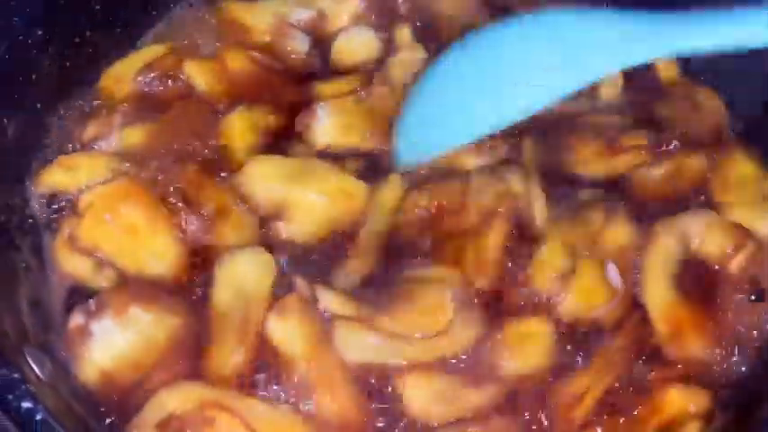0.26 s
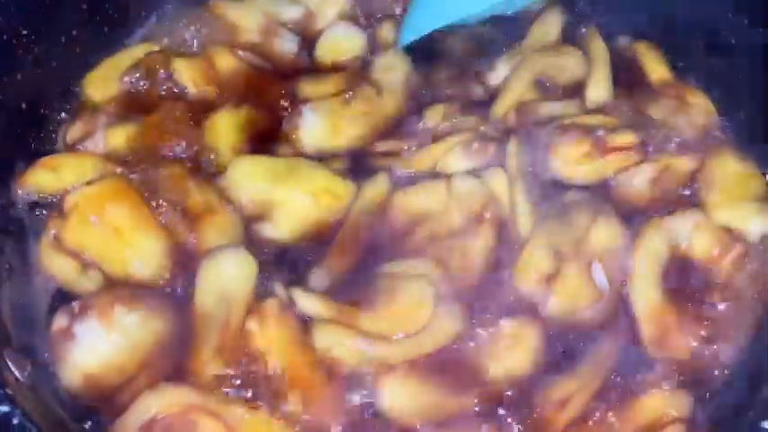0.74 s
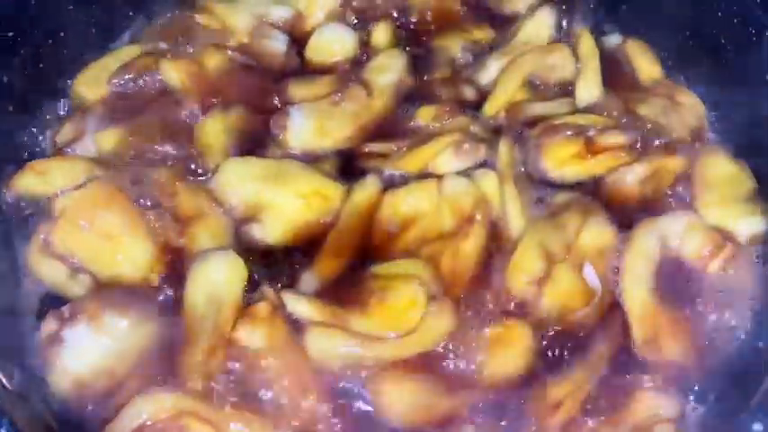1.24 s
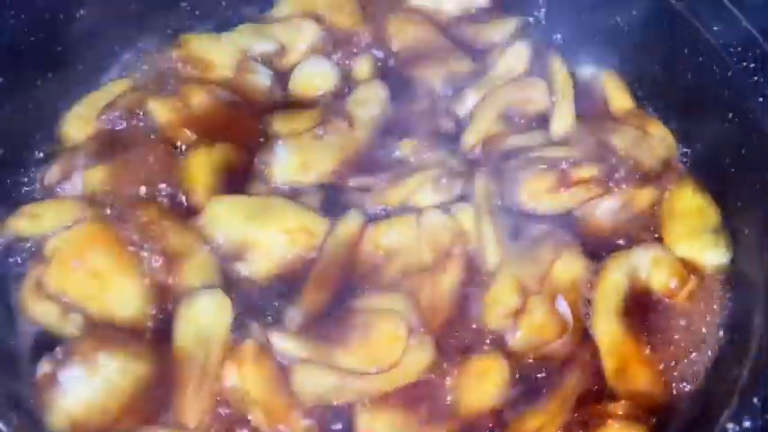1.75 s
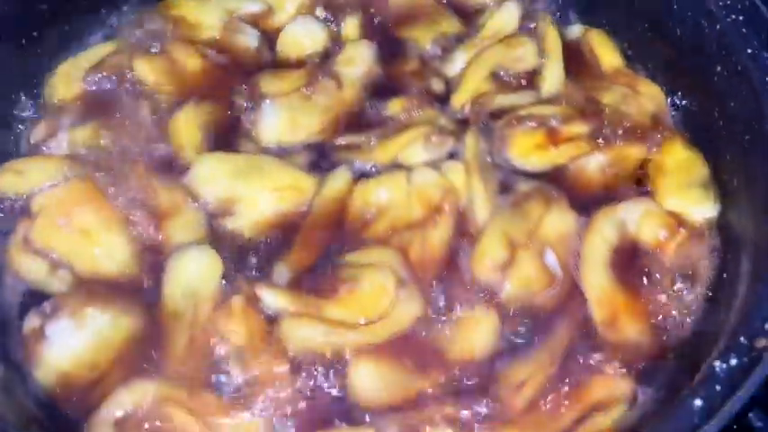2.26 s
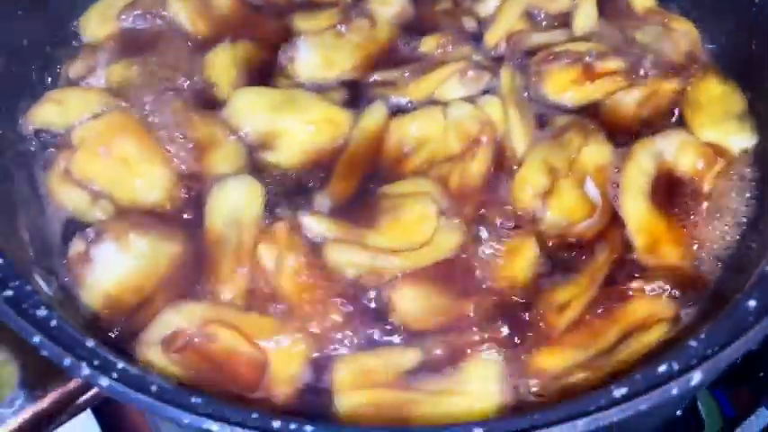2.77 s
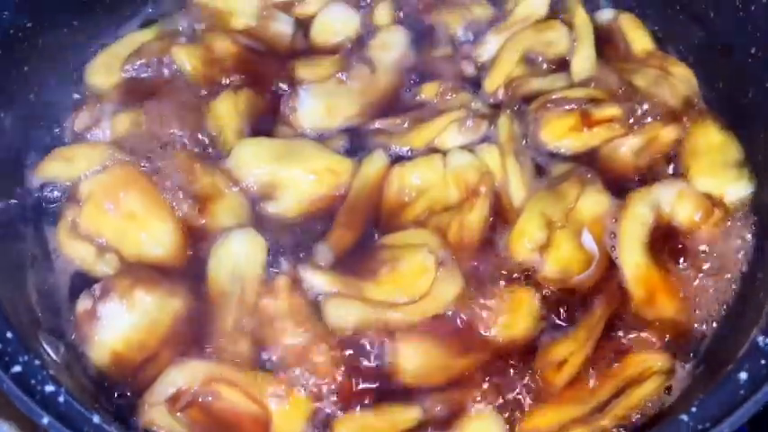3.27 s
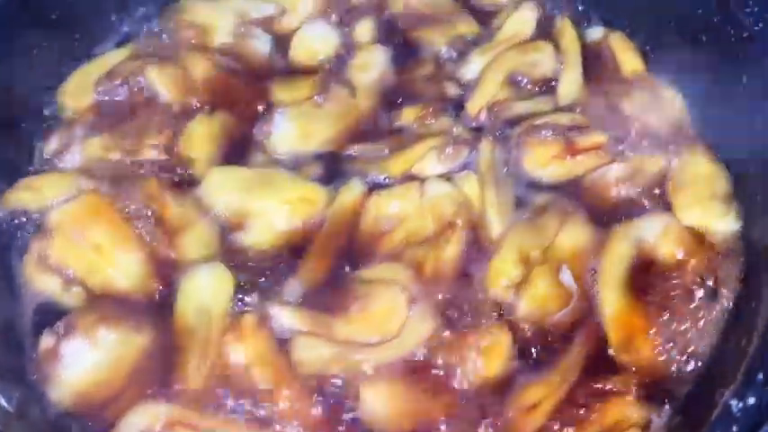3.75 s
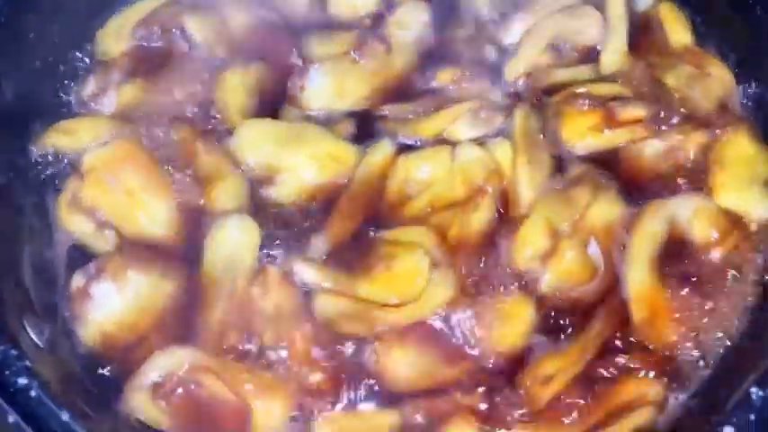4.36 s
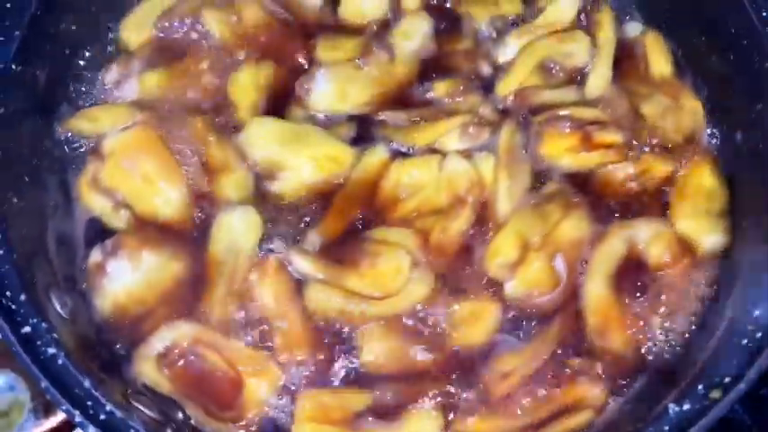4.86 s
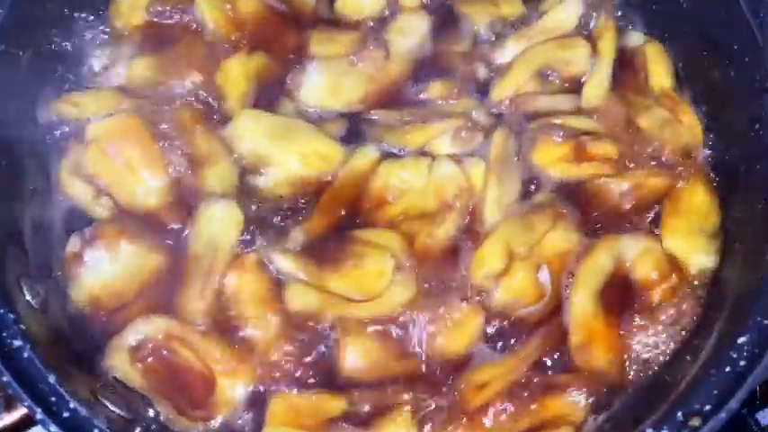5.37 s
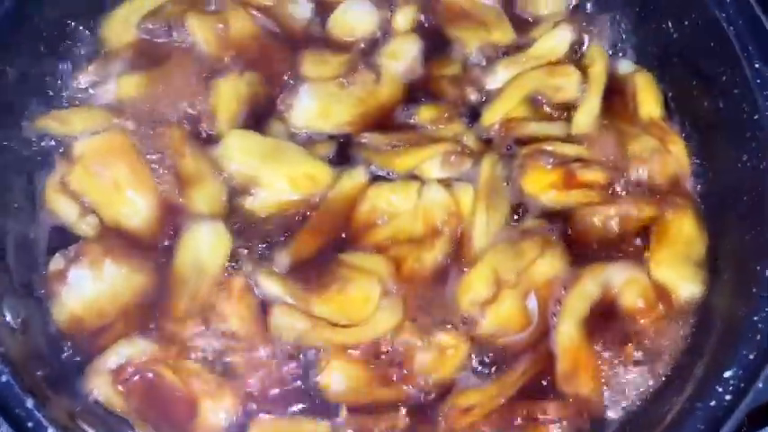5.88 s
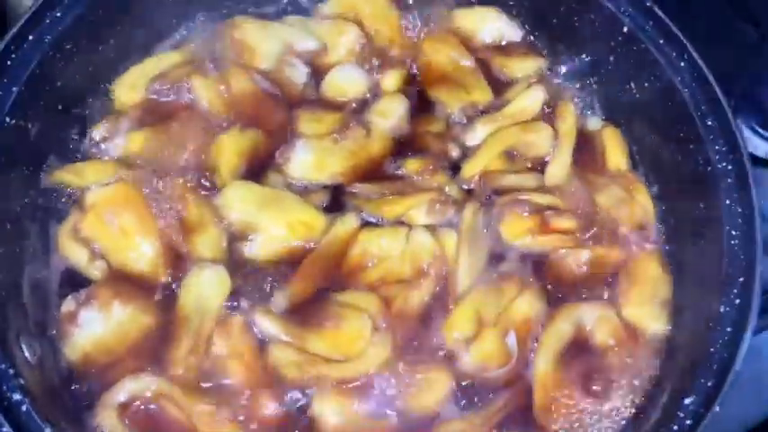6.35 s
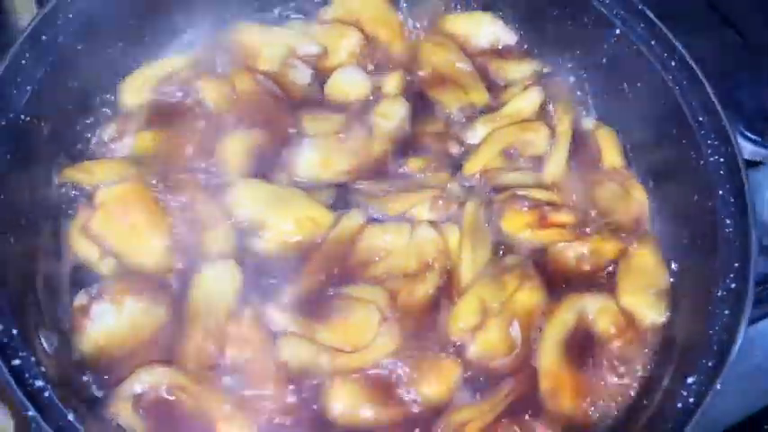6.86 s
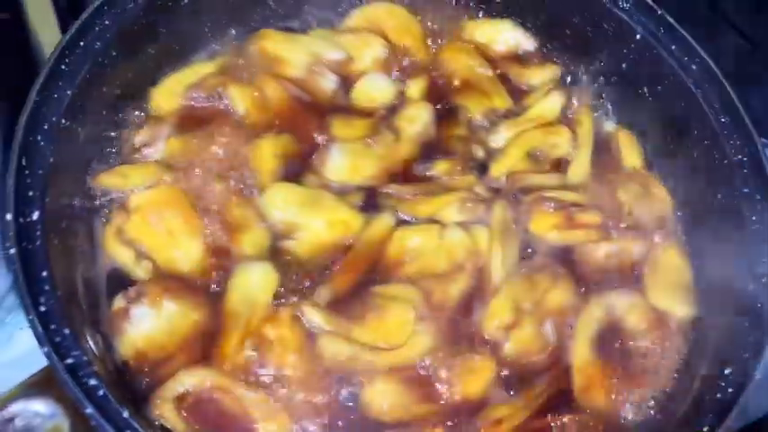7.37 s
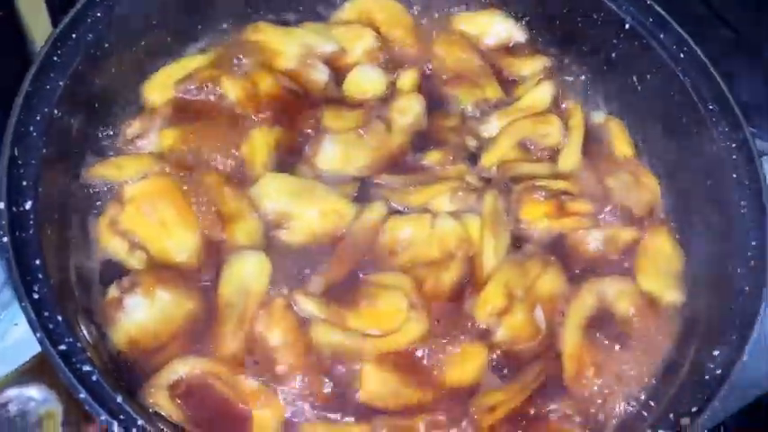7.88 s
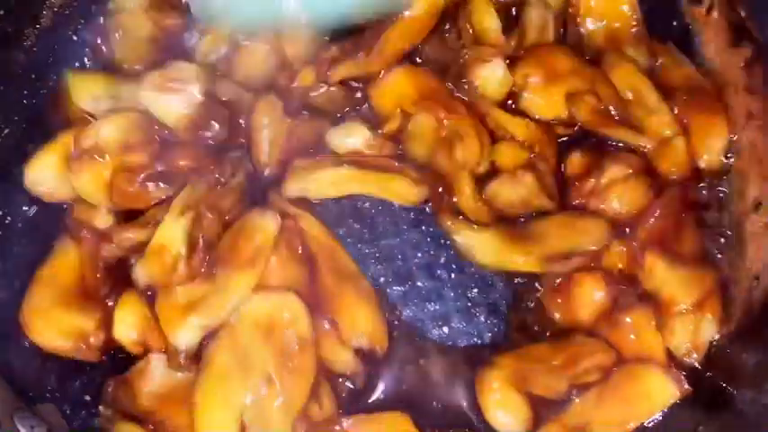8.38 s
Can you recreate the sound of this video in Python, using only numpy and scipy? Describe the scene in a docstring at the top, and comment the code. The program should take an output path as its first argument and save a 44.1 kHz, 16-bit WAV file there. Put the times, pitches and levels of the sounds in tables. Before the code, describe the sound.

Thick syrup with fruit bubbles and pops close up in a pan, sizzling at the rim, with one spatula clack midway, then abrupt silence.

```python
"""Fruit simmers in thick syrup in a pan: bubbles burst as short decaying pressure swings over a dense crowd
of smaller bursts, heard from just above by a pair of close microphone ports.
Syrup sizzles at the hot rim (tiny bursts plus hiss) and spits (ticks with a spray of noise).
A spatula is put down once and bounces: thunks, ringing pan modes, dying noise and two squeaky skids.
Steam brushes the microphone, the stove rumbles and hums below, and the sound stops dead near the end."""
import sys
import numpy as np
from scipy import signal
from scipy.fft import rfft, irfft, next_fast_len
from scipy.io import wavfile
from scipy.ndimage import uniform_filter1d

SR = 44100
rng = np.random.default_rng(int(sys.argv[2]) if len(sys.argv) > 2 else 0)


def waveform_to_disk(signal):
    """Save audio, clipped to [-1, 1], as 16-bit WAV at the path in sys.argv[1]."""
    frames = np.transpose(np.atleast_2d(signal))
    scaled = np.clip(frames, -1, 1) * 32767
    samples = np.round(scaled).astype(np.int16)
    wavfile.write(sys.argv[1], SR, samples)


N = 380141
TIME = np.arange(N) / SR
STOP_S = 8.013
LULL_S, USUAL_GULP_DB = 0.026, -42


# Bursting bubbles that stand out. Each row: start in seconds, pop peak in dB before trim, pitch in Hz,
# cycles to the envelope peak, gulp in dB before trim.
BIG_BUBBLES = [(0.0621, -27, 1280, 0.52, -38), (0.0795, -37, 920, 1.1, -40),
               (0.2958, -37.5, 820, 0.52, -38), (0.4747, -30.5, 880, 0.48, -37),
               (0.534, -38, 1000, 0.35, -56), (0.6841, -31.5, 1410, 1.2, -34.5),
               (0.6916, -30, 1500, 0.85, -45), (0.804, -38, 1380, 0.97, -38),
               (0.9234, -37.0, 1350, 1.1, -35), (1.0993, -26, 1360, 0.6, -35),
               (1.1261, -30, 1280, 1.2, -34), (1.2685, -32.5, 1270, 1, -33.5),
               (1.379, -36.0, 1400, 1.2, -52), (1.405, -27.0, 1360, 1.4, -31), (1.498, -35, 900, 0.53, -38),
               (1.5054, -26.5, 1450, 0.35, -47), (1.59, -33.0, 1400, 0.41, -50),
               (1.7188, -27.5, 850, 0.21, -46), (1.822, -29, 1110, 0.23, -35.5),
               (1.883, -31.0, 1200, 0.32, -59), (1.9688, -29.5, 880, 0.25, -39),
               (2.0827, -28, 1210, 0.34, -46), (2.097, -37, 774, 0.69, -51), (2.1994, -39, 796, 0.9, -42),
               (2.227, -29, 1150, 0.25, -40), (2.3073, -28.5, 1310, 0.25, -40),
               (2.3657, -27.5, 1360, 0.32, -35), (2.5519, -33.0, 1120, 0.45, -42),
               (2.6306, -28.5, 1000, 0.25, -35), (2.6416, -33, 1310, 0.25, -50),
               (2.7003, -24, 1550, 0.45, -34), (2.9356, -32.0, 784, 0.3, -31),
               (3.0884, -24.0, 1280, 1.4, -33), (3.3576, -35, 1070, 0.45, -44),
               (3.3647, -37, 1440, 0.75, -40), (3.3844, -29, 970, 0.29, -39), (3.5063, -38, 1610, 0.9, -42),
               (3.7616, -32.0, 1190, 0.35, -44), (3.8263, -31.5, 1150, 0.25, -50),
               (3.9435, -30, 1190, 0.28, -52), (4.106, -33.5, 1390, 0.82, -37),
               (4.235, -33, 1530, 0.9, -35.5), (4.33, -35, 790, 0.45, -41), (4.3532, -39, 1310, 0.29, -46),
               (4.655, -34.5, 1550, 0.6, -41), (4.7335, -37.5, 1400, 1.2, -48),
               (4.8703, -33.5, 900, 0.99, -37.5), (4.889, -28.5, 1000, 0.32, -43),
               (5.1397, -35.5, 1110, 0.45, -51), (5.2265, -29.5, 1420, 1.1, -38),
               (5.2815, -28, 880, 0.3, -41), (5.353, -26, 1520, 1.3, -35), (5.4519, -32, 970, 0.25, -36),
               (6.0556, -24, 1160, 0.45, -45), (6.0772, -28.5, 1264, 0.42, -33),
               (6.126, -34.5, 850, 0.56, -46), (6.2245, -30, 820, 0.23, -40), (6.281, -32, 1050, 0.71, -46),
               (6.3694, -35.5, 1260, 0.6, -47), (6.58, -34.5, 650, 0.45, -38),
               (6.6895, -33.5, 1660, 0.6, -41), (6.7833, -34, 780, 0.72, -30.5),
               (6.8603, -33, 1150, 0.42, -43), (6.867, -39, 740, 0.67, -32), (6.8931, -40, 1260, 0.68, -51),
               (6.973, -38.0, 1400, 1.1, -43), (6.9805, -36, 1400, 0.97, -33.5),
               (7.0138, -34.5, 1150, 1, -43), (7.1089, -31, 1000, 0.68, -49), (7.279, -37, 1350, 0.69, -36),
               (7.374, -25, 1000, 0.29, -38), (7.5709, -39, 800, 0.68, -45), (7.613, -31, 1100, 0.42, -36),
               (7.619, -38, 860, 0.9, -37), (7.688, -39, 1190, 1.1, -57), (7.7032, -34, 1410, 0.8, -41),
               (7.7123, -33, 1200, 0.45, -55), (7.8598, -30.5, 1730, 0.53, -46)]
# Splutter spectrum. Each row: frequency in Hz, relative density in dB per Hz.
SPLUTTER_SPECTRUM = [(100, -17), (350, -3.5), (850, 2.5), (1100, -7), (1450, 1.5), (2400, -6.5),
                     (3300, -14), (6000, -39), (16000, -51)]
# Pop colouring. Each row: frequency in Hz, gain in dB.
POP_GAIN = [(100, -15.5), (400, -5.5), (700, 1), (1500, 0), (2500, 1.5), (3500, -9), (8000, -13.5)]


def plops(level_db=-1.5, tear_hz=2200, tear_db=-11, body_hz=720, body_db=-8,
          gulp_hz=410, gulp_cycles=0.72, gulp_level_db=-2, wall_s=0.0017, wall_db=-13,
          splutter_s=0.011, splutter_db=-48, splutter_per_gulp=0.3, size=1400):
    """A film snaps or rings over a rounder body; the pan wall echoes, the syrup gulps shut and splutters."""
    pops, syrup = np.zeros(N), np.zeros(N)
    splutter_decay = np.exp(-TIME[:size] / splutter_s)
    for s, db, hz, cycles, gulp_db in np.vstack([BIG_BUBBLES, lesser_bubbles()]):
        place, depth = rng.standard_normal(2)
        tear = gain_of(tear_db) * burst(tear_hz, 0.39, size)
        pop = gain_of(db + level_db) * (burst(hz, cycles, size) + tear)
        body = gain_of(db + body_db) * cycles * burst(body_hz, 0.5, size)
        add(pops, s, pop + body)
        add(pops, s + wall_s * np.exp(0.27 * place), gain_of(wall_db) * pop)

        gulp = burst(gulp_hz * np.exp(-0.2 * depth), gulp_cycles, size)
        add(syrup, s, gain_of(gulp_db + gulp_level_db) * gulp)
        # deeper gulps splutter more
        wet_db = splutter_db + splutter_per_gulp * (gulp_db - USUAL_GULP_DB)
        hiss = evened(tint(rng.standard_normal((1, size)), SPLUTTER_SPECTRUM))[0]
        add(syrup, s, gain_of(wet_db) * hiss * splutter_decay)
    return ports(tint(pops[None], POP_GAIN)[0] + syrup)


# Lulls when hardly a bubble bursts. Each entry: centre in seconds.
LULL_TIMES = [0.41, 0.755, 1.23, 1.76, 2.035, 2.45, 3.03, 3.889, 4.17, 4.4, 5.51, 5.89, 6.17, 7.05, 7.19,
              7.53, 7.825]


def lesser_bubbles(per_s=6, level_db=-40, spread_db=0.5, usual_hz=1200, spread_octaves=0.35,
                   usual_cycles=0.57, gulp_re_pop_db=-8):
    """Middling bubbles burst at random moments outside the lulls; rows as in BIG_BUBBLES."""
    when, size, depth, ring = rng.standard_normal((200, 4)).T
    s = (np.arange(len(when)) + when) / per_s
    db = level_db + spread_db * size
    hz = usual_hz * 2 ** (spread_octaves * depth)
    cycles = usual_cycles * np.exp(0.35 * ring)
    rows = np.c_[s, db, hz, cycles, db + gulp_re_pop_db]
    resting = abs(s[:, None] - np.array(LULL_TIMES)).min(1) < 2 * LULL_S
    return rows[(s > 0) & (s < STOP_S) & ~resting]


# Small-bubble spectrum. Each row: frequency in Hz, relative density in dB per Hz.
SIMMER_SPECTRUM = [(60, -31), (150, -14.5), (320, 6), (410, -5.5), (500, -1.5), (640, -3.5), (870, 1.5),
                   (1050, -4.5), (1330, 0), (1700, -4), (2350, -7.5), (3300, -21), (6000, -36),
                   (16000, -55)]


def simmer(level_db=-49, clump_s=0.018, clump_db=1.4):
    """Countless small bubbles burst in thick syrup; a random level waver and the surges clump them."""
    crowd = swarm(lo_hz=175.5, hi_hz=3080, per_s=650, spread_db=2.5, cap_db=10.5, cycles=0.3,
                  spray_db=-12.5, spray_s=0.004)
    knots_s = np.cumsum(rng.uniform(0.5, 1.5, 2000)) * clump_s
    clumps = evened(np.interp(TIME, knots_s, rng.uniform(-1, 1, len(knots_s))))
    clumped = evened(tint(crowd, SIMMER_SPECTRUM) * gain_of(clump_db * clumps))
    return ports(*(clumped * gain_of(level_db + surges())))


def surges(surge_db=4, surge_s=0.019, from_gulp_db=-53, gulp_range_db=14.5, lull_db=5.5):
    """Boil level in dB: big bubbles with deep gulps stir their neighbours; in a lull spent syrup rests."""
    t = TIME[::128, None]
    s, gulp_db = np.array(BIG_BUBBLES)[:, 0], np.array(BIG_BUBBLES)[:, -1]
    stir = np.maximum(gulp_db - from_gulp_db, 0) / gulp_range_db
    swell = ((t > s) * stir * np.exp(-abs(t - s) / surge_s)).max(1)
    rest = np.exp(-((t - np.array(LULL_TIMES)) / LULL_S) ** 2).max(1)
    return np.interp(TIME, t[:, 0], surge_db * swell - lull_db * rest)


# Rim sizzle curve. Each row: time in seconds, level in dB, of which only the swing about the median is
# used, scaled by "follow".
SIZZLE_CURVE = [(0.0, -57.5), (0.84, -58), (1.08, -56.5), (1.92, -58), (2.04, -57), (2.28, -58.5),
                (2.4, -57.5), (3.24, -57.5), (3.6, -57), (3.72, -58), (4.08, -58), (6.96, -57), (7.08, -58),
                (7.99, -57.5)]
# Rim sizzle spectrum. Each row: frequency in Hz, relative density in dB per Hz.
SIZZLE_SPECTRUM = [(800, -32), (2500, 2.5), (4000, 1.5), (6500, 1.5), (10500, -2), (13500, -8), (14700, -6),
                   (16000, -8)]


def sizzle(level_db=-58.0, hiss_db=-3, follow=3.5):
    """Tiny droplets flash to steam at the rim over a fine hiss."""
    crackle = evened(swarm(lo_hz=2500, hi_hz=14300, per_s=1300, spread_db=3.5, cap_db=18.0, cycles=0.61,
                           spray_db=1.5, spray_s=0.004))
    fizz = crackle + gain_of(hiss_db) * rng.standard_normal((2, N))
    level = gain_of(level_db + follow * swing(SIZZLE_CURVE))
    return ports(*(evened(tint(fizz, SIZZLE_SPECTRUM)) * level))


# Loudest droplets on hot metal. Each row: time in seconds before the flash delay, level in dB before trim,
# tick body in dB relative to that level before the wet trim.
SPIT_DROPS = [(0.0278, -32, -26), (0.044, -42, -14), (0.0662, -35, -6), (0.1493, -37, 7),
              (0.3492, -35, -19), (0.5397, -43, -12), (0.7187, -36.5, -3), (0.959, -38, -1),
              (0.97, -37, -10), (1.0271, -41, -17), (1.059, -34.5, -12), (1.1044, -37, 0),
              (1.2623, -35.5, -24), (1.305, -36.5, -3), (1.4643, -43, -14), (1.5855, -37, -32),
              (1.717, -36, -29), (1.7812, -36, -30), (2.0492, -37, -11), (2.1108, -37, -12),
              (2.396, -42, -17), (2.5506, -37, -7), (2.8657, -38, -20), (3.1155, -36.5, -26),
              (3.5334, -45, -26), (3.8229, -37, -4), (4.106, -38, -24), (5.0, -39, -11), (5.031, -40, -19),
              (5.4202, -40, -21), (5.452, -34, 10), (6.0766, -31.5, -15), (6.1332, -36.5, -21),
              (6.281, -40, -27), (6.3684, -36, -26), (6.399, -35, 6), (6.7828, -30.5, -18),
              (7.6125, -35.5, -2)]


def spits(level_db=8.0, top_hz=10500, top_cycles=0.3, body_hz=4300, body_cycles=0.13, wet_db=8,
          thud_hz=700, thud_db=-11, flash_s=0.001):
    """A sharp tick with a brief spray behind it; the wetter the droplet, the more it thuds in the syrup."""
    out = np.zeros(N)
    for s, db, body_db in SPIT_DROPS:
        wet = gain_of(body_db + wet_db)
        tick = burst(top_hz, top_cycles) + wet * burst(body_hz, body_cycles)
        spit = np.convolve(tick, spray(db=0.0, decay_s=0.0089))
        thud = burst(thud_hz * np.exp(0.28 * rng.standard_normal()), 0.45)
        add(spit, 0, wet * gain_of(thud_db) * thud)
        add(out, s + flash_s, gain_of(db + level_db) * spit / np.hypot(1, wet))
    return ports(out)


# Spatula landing and bounces. Each row: time in seconds, strength in dB before trim,
# contact hardness as a low-pass cut-off in Hz, thunk pitch in Hz, thunk level in dB.
BOUNCES = [(2.716, -12.5, 10900, 2400, -27.5), (2.717, -9, 1500, 1173, -12), (2.7227, -19, 1395, 790, -23),
           (2.751, -13, 1604, 1180, -17), (2.7546, -8.5, 716, 546, -15), (2.7796, -15, 1698, 1090, -22)]
# Dense clatter spectrum. Each row: frequency in Hz, relative density in dB per Hz.
CLATTER_SPECTRUM = [(60, -20.5), (200, -10.5), (600, -1), (850, -4), (1200, -1.5), (1700, -15), (2300, -13),
                    (3700, -8.5), (4500, -24.5), (6000, -14.5), (7400, -27.5), (11000, -25.5), (16000, -18)]
# Clatter decay. Each row: frequency in Hz, t60 in seconds.
CLATTER_DECAY = [(200, 0.15), (1200, 0.16), (2300, 0.28), (4000, 0.14), (12000, 0.12)]


def spatula(level_db=-3.0, clatter_db=-19, crack_db=-6.5, crack_s=0.00077,
            thunk_cycles=1.0, thunk_lag_s=0.00067, size=16384):
    """Each bounce thunks at its own pitch and rings the pan; softer contacts leave the high modes still."""
    out = np.zeros((2, N))
    level = gain_of(clatter_db) + gain_of(crack_db) * np.exp(-TIME[:size] / crack_s)
    for s, db, hard_hz, thunk_hz, thunk_db in BOUNCES:
        clatter = tint(dying_noise(CLATTER_DECAY), CLATTER_SPECTRUM)
        blow = clatter / clatter[:, :size // 32].std() * level
        blow[0] += pan_ring(thunk_hz, size)
        softened = signal.lfilter(*signal.butter(2, hard_hz, fs=SR), blow)
        add(out, s, gain_of(db + level_db) * softened)
        add(out[0], s + thunk_lag_s, gain_of(thunk_db) * burst(thunk_hz, thunk_cycles, size))
    left, right = ports(*out)
    # the blow lands on the left, so the right port lies in shadow: (Hz, dB)
    near = [(400, -4.0), (750, 7.0), (1500, 2.5), (4000, 4.0)]
    far = [(400, -4.5), (750, -2.5), (1500, -2.5), (3000, -0.5), (6000, 7.0)]
    return np.vstack([tint(left[None], near), tint(right[None], far)])


# Pan resonances. Each row: frequency in Hz, level in dB before the boost near the blow, t60 in seconds.
RING_MODES = [(122, -15.5, 0.26), (134.5, -10.5, 0.3), (262, -18.5, 0.25), (299, -9, 0.32),
              (439, -14, 0.23), (481, -19.5, 0.17), (544, -23, 0.12), (598, -21, 0.11), (642, -22, 0.098),
              (696, -21, 0.17), (804.6, -20.5, 0.16), (915, -26, 0.1), (1002, -22.5, 0.11),
              (1080, -24.5, 0.13), (1180, -20, 0.14), (1378, -23, 0.13), (1860, -34, 0.21),
              (2010, -31.5, 0.21), (2390, -32.5, 0.14), (3230, -29, 0.15), (3332, -22, 0.36),
              (3390, -26, 0.11), (3440, -29, .13), (3920, -25, 0.06), (5004, -27.5, 0.24),
              (5647, -37.5, .2), (6990, -16, 0.087), (10800, -28.5, 0.048), (11300, -25, 0.057),
              (12160, -25, 0.078), (12680, -25.5, 0.065), (13850, -27.5, .05)]


def pan_ring(thunk_hz, size, bloom_cycles=1.2, near_db=6, near_octaves=0.41,
             rough=0.3, rough_from_hz=1500, rough_s=0.0064):
    """Modes build up in a cycle or two, most near the blow's pitch; spatula chatter roughens high ones."""
    t, ring = TIME[:size], np.zeros(size)
    for hz, db, t60 in RING_MODES:
        chatter = np.interp(t, np.arange(400) * rough_s, rng.standard_normal(400))
        db = db + near_db * np.exp(-(np.log2(hz / thunk_hz) / near_octaves) ** 2)
        build_up = 1 - np.exp(-hz * t / bloom_cycles)
        roughness = 1 + rough * (hz > rough_from_hz) * chatter
        ring += gain_of(db - 60 * t / t60) * build_up * roughness * np.sin(2 * np.pi * hz * t)
    return ring


# Spatula skids as it settles. Each row: start in seconds, length in seconds, level in dB, mean pitch in Hz.
SKID_SQUEAKS = [(2.76, .028, -38.5, 1904), (2.793, .03, -41, 1880)]


def skids(jitter=0.026, left_db=-3):
    """Brief squeaks of unsteady pitch as the spatula slips on the metal."""
    out = np.zeros(N)
    for s, length_s, db, hz in SKID_SQUEAKS:
        size = int(length_s * SR)
        wander = evened(uniform_filter1d(rng.standard_normal(4096), size=64))[:size]
        phase = 2 * np.pi * np.cumsum(hz * (1 + jitter * wander)) / SR
        add(out, s, gain_of(db) * np.hanning(size) ** 0.5 * np.sin(phase))
    return ports(out) * gain_of([[left_db], [0]])


# Steam eddies at the microphone. Each row: centre in seconds, level in dB, mid pitch in Hz.
EDDIES = [(3.52, -37, 59), (4.049, -43, 57.3), (4.532, -36, 76), (4.6, -39, 59.4), (4.995, -44, 57.6),
          (5.054, -33.5, 84.4), (5.115, -33.5, 58.2), (5.6, -42, 70), (5.97, -44, 49.5), (6.1, -43, 97)]


def steam(cycles=3.8, pitch_fall=0.32, lumps_db=-10, lumps_hz=170):
    """Soft, lumpy eddies of rising steam, a few cycles long and sinking in pitch, push both ports alike."""
    out = np.zeros(N)
    for s, db, hz in EDDIES:
        length_s = cycles / hz
        t = TIME[:int(length_s * SR)] - length_s / 2
        lumps = signal.lfilter(*signal.butter(2, lumps_hz, fs=SR), rng.standard_normal(SR))
        tone = np.cos(2 * np.pi * hz * t * (1 - pitch_fall * t / length_s / 2))
        eddy = tone + gain_of(lumps_db) * evened(lumps)[:len(t)]
        add(out, s - length_s / 2, -gain_of(db) * np.hanning(len(t)) * eddy)
    return out


# Stove rush spectrum. Each row: frequency in Hz, relative density in dB per Hz.
RUMBLE_SPECTRUM = [(15, -30.5), (30, -5), (45, 0), (65, -4.5), (95, -7.5), (170, -9.5), (300, -12),
                   (600, -21), (1500, -18.5), (3500, -29), (16000, -41.5)]
# Stove hum. Each row: frequency in Hz, rms level in dB ahead of the ports.
HUM_TONES = [(60, -59), (134, -61.5), (198, -66), (240, -68.5), (300, -66.5)]


def stove(rumble_db=-48.0, waver_rad=0.62):
    """The low rush of the stove as coloured noise, with hum tones whose phase wanders at random."""
    rumble = gain_of(rumble_db) * evened(tint(rng.standard_normal((2, N)), RUMBLE_SPECTRUM))
    knots_s = np.arange(0, N / SR, 1 / 10)
    for hz, db in HUM_TONES:
        walk = waver_rad * np.cumsum(rng.standard_normal(len(knots_s)))
        drift = np.interp(TIME, knots_s, walk)
        rumble[0] += gain_of(db) * np.sqrt(2) * np.sin(2 * np.pi * hz * TIME + drift)
    return ports(*rumble)


def kitchen(x, wet_db=-14, dull_hz=2800, build_s=0.0047):
    """A short, faint, dull tail from the walls: dying noise, faded in and low-passed."""
    tail = dying_noise([(200, 0.27), (2000, 0.46), (12000, 0.16)])  # (Hz, t60 s)
    tail *= np.minimum(TIME[:tail.shape[1]] / build_s, 1)
    tail = signal.lfilter(*signal.butter(2, dull_hz, fs=SR), tail / np.linalg.norm(tail[0]))
    return x + gain_of(wet_db) * signal.oaconvolve(x, tail, axes=1)[:, :N]


# Port phase. Each row: frequency in Hz, radians by which left leads right.
PHASE_LEAD = [(0, 0), (590, 0), (720, 0.8), (1200, 0.02), (2750, 0.5), (3200, 1.04), (5300, 0), (7000, 3.5),
              (7900, 3.5), (9600, 6.5), (11500, 6.5), (12700, 11.5), (14400, -11.5), (15400, 6.5)]
# Port likeness. Each row: frequency in Hz, likeness from 0 to 1.
LIKENESS = [(50, 0.98), (450, 0.95), (680, 0.42), (1000, 0.375), (1400, 1), (2200, 1), (2950, 0.14),
            (4200, 0.22), (5500, 0.31), (7200, 1), (8600, 0.9), (10000, 0.99), (12000, 0.96), (13500, 0.97)]
# Port balance. Each row: frequency in Hz, left minus right in dB.
BALANCE = [(70, 0), (160, -3), (400, -4), (600, -8), (850, -3.5), (1000, -0.5), (1700, 0), (2700, -2.5),
           (3700, -0.5), (4800, -2), (6000, 0)]


def ports(common, apart=None):
    """Sound reaches the ports with a phase lag; a scattered part reaches them with opposite signs."""
    size = next_fast_len(N)
    hz = np.fft.rfftfreq(size, 1 / SR)
    sign = np.array([[1], [-1]])
    z = rfft(common, size)
    if apart is not None:
        like = read(LIKENESS, hz)
        scattered = sign * rfft(apart, size) * np.sqrt((1 - like) / 2)
        z = z * np.sqrt((1 + like) / 2) + scattered
    lag = np.exp(0.5j * sign * read(PHASE_LEAD, hz))
    balance = gain_of(sign * read(BALANCE, hz) / 2)
    return irfft(z * lag * balance, size)[:, :N]


def burst(hz, cycles, size=700):
    """A film tears: a pressure swing that builds and dies within a few cycles."""
    turns = hz * np.arange(size) / SR
    u = turns / cycles
    return u * np.exp(1 - u) * np.sin(2 * np.pi * turns)


def spray(db, decay_s, size=700):
    """One impulse with a dying scatter of droplets behind it; db is scatter energy re the impulse."""
    scatter = rng.standard_normal(size) * np.exp(-TIME[:size] / decay_s)
    return np.r_[1, gain_of(db) * scatter / np.linalg.norm(scatter)]


def swarm(lo_hz, hi_hz, per_s, spread_db, cap_db, cycles, spray_db, spray_s, count=16):
    """Two independent crowds of bursts at `count` pitches: many small, a few large."""
    out = np.zeros((2, N))
    per_pitch = int(per_s * N / SR / count)
    for hz in np.geomspace(lo_hz, hi_hz, count):
        for crowd in out:
            grain = np.convolve(hz * burst(hz, cycles), spray(spray_db, spray_s))[:700]
            at, chance, sign = rng.random((per_pitch, 3)).T
            size_db = np.minimum(-spread_db * np.log(1 - chance), cap_db)
            size = gain_of(size_db) * np.sign(sign - 0.5)
            where = (at * N).astype(int)[:, None] + np.arange(len(grain))
            crowd += np.bincount(where.ravel(), (size[:, None] * grain).ravel(), N)[:N]
    return out


def dying_noise(t60s, size=16384):
    """Two channels of noise, each band dying at its own speed."""
    hz, t, z = signal.stft(rng.standard_normal((2, size)), SR, nperseg=256)
    decay = gain_of(-60 * t / read(t60s, hz)[:, None])
    return signal.istft(z * decay, SR, nperseg=256)[1]


def tint(x, spectrum, size=4096):
    """Causal minimum-phase colouring, so that clicks keep their sharp fronts."""
    log_gain = np.log(gain_of(read(spectrum, abs(np.fft.fftfreq(size, 1 / SR)))))
    min_phase = np.exp(np.conj(signal.hilbert(log_gain)))
    response = np.fft.ifft(min_phase).real[:size // 2]
    return signal.oaconvolve(x, response[None], axes=1)[:, :x.shape[1]]


def gain_of(db):
    """Decibels to a factor."""
    return 10 ** (np.asarray(db) / 20)


def evened(x):
    """Scaled to an rms of one."""
    return x / np.sqrt(np.mean(x ** 2) + 1e-20)


def read(points, hz):
    """A table joined by straight lines over log frequency."""
    f, value = np.transpose(points)
    return np.interp(np.log(hz + 1), np.log(f + 1), value)


def swing(curve):
    """A level curve in dB about its median."""
    s, db = np.transpose(curve)
    return np.interp(TIME, s, db - np.median(db))


def add(mix, s, sound):
    """Mixes a sound in at time s, cut off at the end of the mix."""
    part = mix[..., max(round(s * SR), 0):][..., :sound.shape[-1]]
    part += sound[..., :part.shape[-1]]


def scene():
    """The pan in its kitchen, over the stove, with steam at the microphone."""
    pan = plops() + simmer() + sizzle() + spits() + spatula() + skids()
    return kitchen(pan) + steam() + stove()


def record(dry, low_cut_hz=36, edge_hz=15900):
    """The microphone sheds the deepest bass; the sound stops dead; then the band limit."""
    high_pass = signal.butter(4, low_cut_hz, "high", fs=SR, output="sos")
    heard = signal.sosfilt(high_pass, dry) * (TIME < STOP_S)
    low_pass = signal.firwin(511, edge_hz, window=("kaiser", 9), fs=SR)
    return signal.oaconvolve(heard, low_pass[None], "same")


dry = scene()
out = record(dry)
waveform_to_disk(out)
```